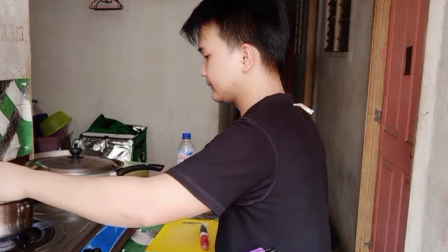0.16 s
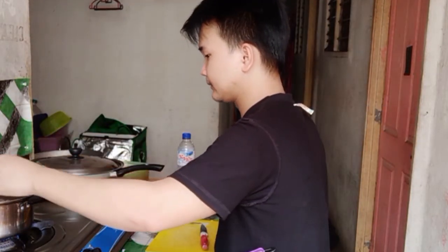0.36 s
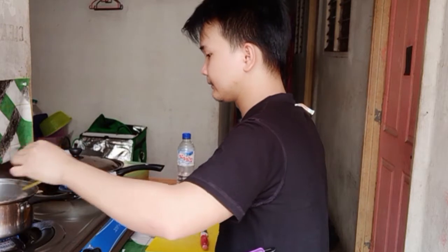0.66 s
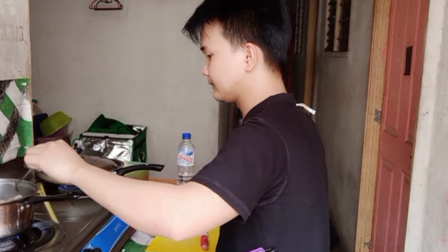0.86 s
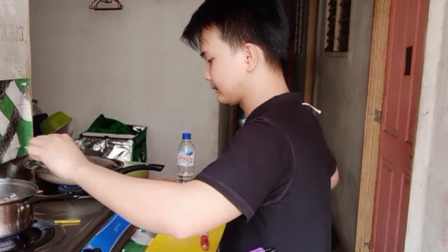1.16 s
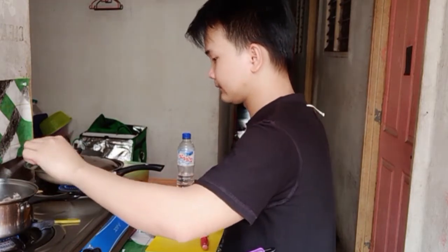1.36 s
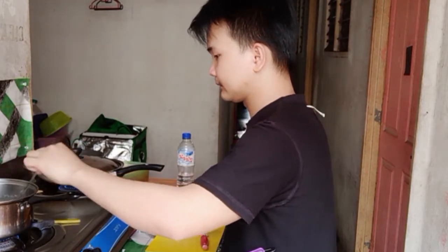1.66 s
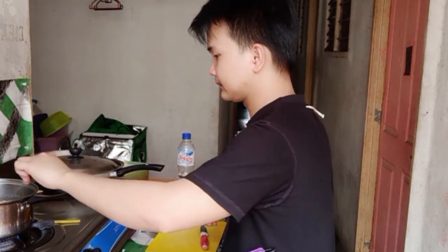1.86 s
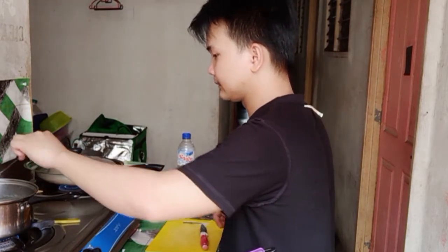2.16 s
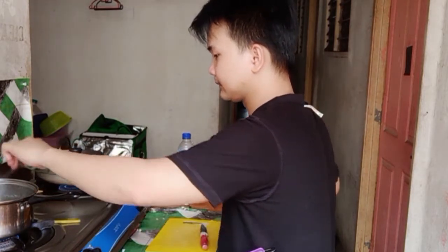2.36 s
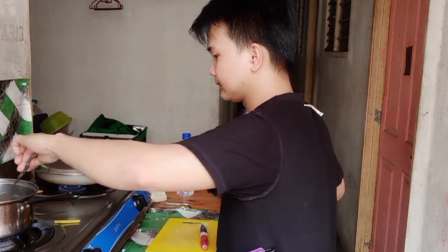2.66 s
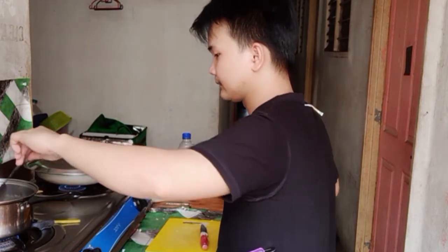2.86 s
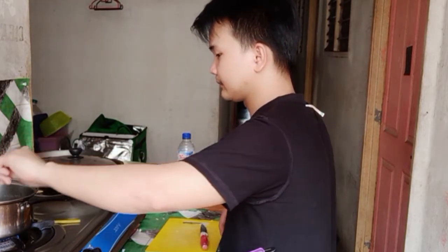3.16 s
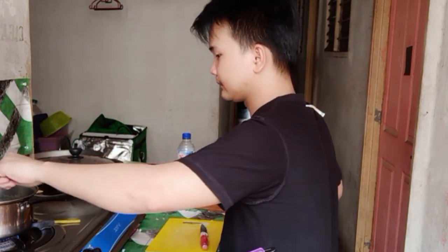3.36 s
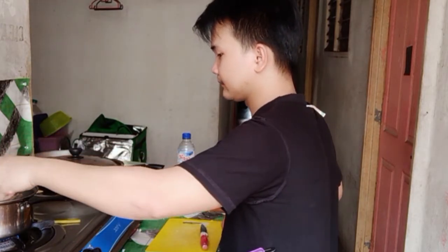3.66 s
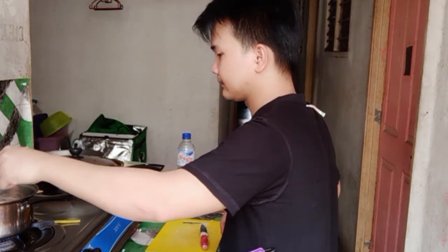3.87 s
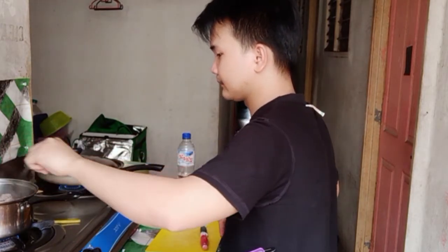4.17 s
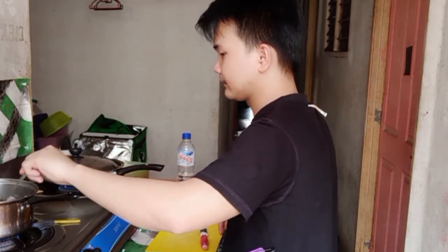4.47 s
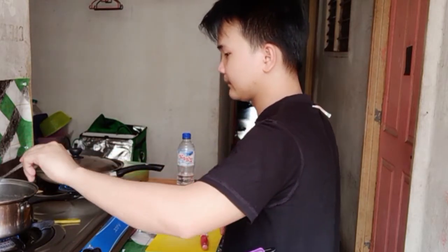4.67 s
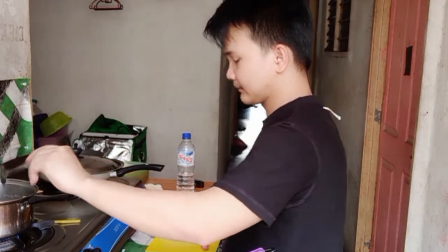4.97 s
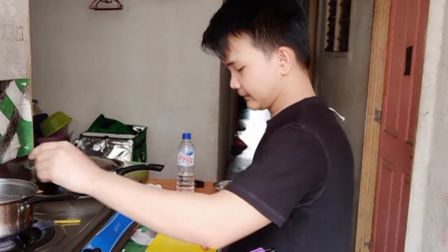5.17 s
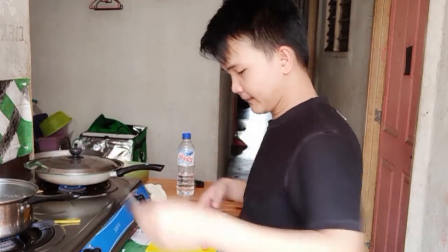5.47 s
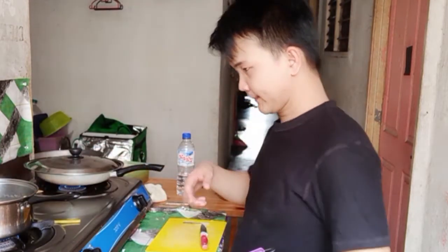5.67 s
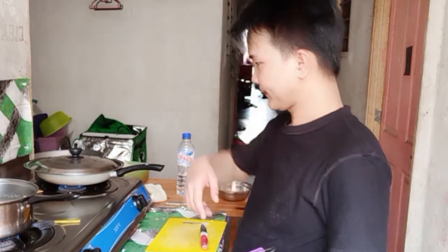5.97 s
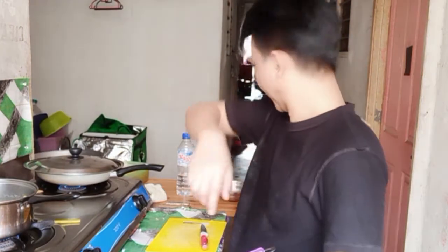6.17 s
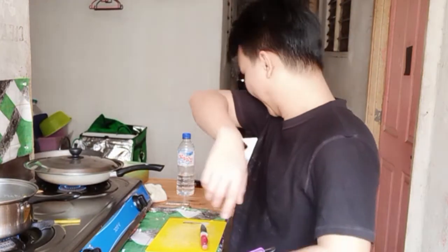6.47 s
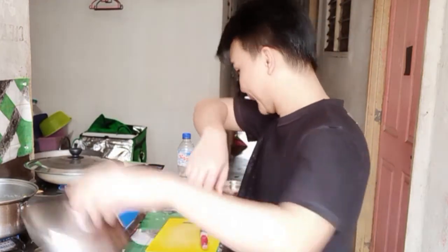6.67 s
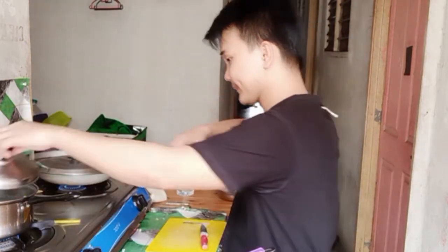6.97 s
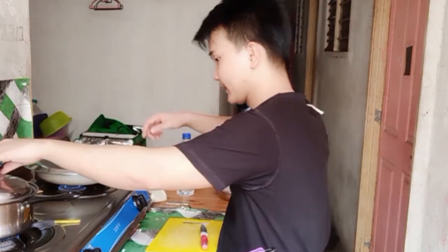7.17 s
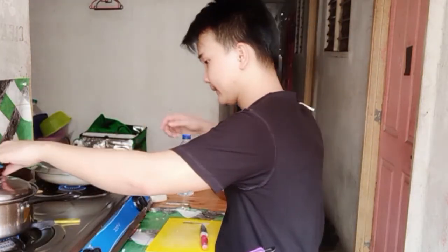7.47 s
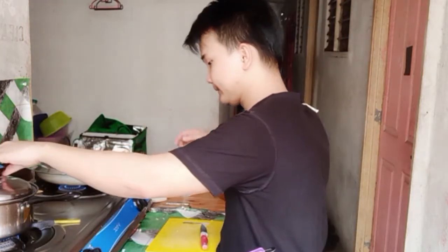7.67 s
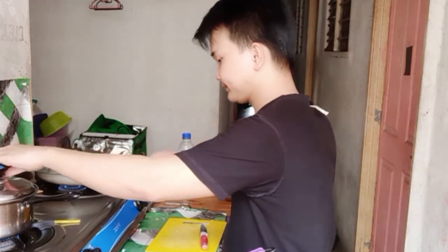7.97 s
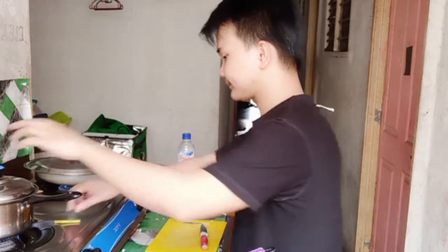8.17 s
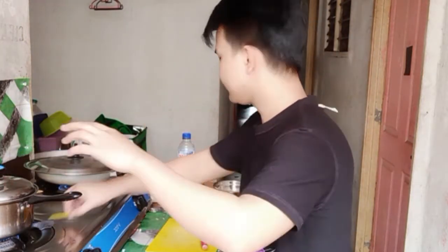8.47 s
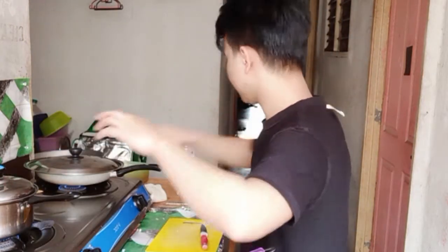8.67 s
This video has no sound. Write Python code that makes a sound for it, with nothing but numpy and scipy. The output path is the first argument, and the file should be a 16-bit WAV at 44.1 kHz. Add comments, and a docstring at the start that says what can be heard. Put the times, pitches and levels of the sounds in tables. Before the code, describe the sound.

A nearby phone picks up, in mono, a small hard-walled kitchen with short, bright reflections. Throughout, a faint gas flame rumbles with a barely audible note, and a hot pot hisses; soft narrow sizzles swell during the first five seconds as a spoon stirs. At 2.0 s the metal spoon ticks the pot with a short scrape; at 2.85 to 3.0 s come firmer clinks with dull knocks, then gritty rubs until 3.25. Only sizzling follows until 5.33, when the spoon's handle lands and it bounces rapidly until about 5.65, a loud bright clatter leaving a thin fading ring. Soft low thumps run from 6.1 to 6.7. At 6.87 a steel lid clanks on the rim, wobbles in quick, weakening low beats until 7.2, rubs hollowly near 7.4 and drops into its seat at 7.52 with a clunk and boom. The pot knocks dully around 8.03 to 8.1; the hiss continues.

```python
"""Cooking at a gas stove in a small, hard-walled kitchen, heard in mono by a phone nearby.
From the start a flame rumbles and a pot hisses, with soft swells of narrower hiss, all shaped noise. At 2 s a metal
spoon taps and scrapes the pot: cracks, ringing modes, gritty rubs, with dull knocks that boom in the counter. At 5.3 s
the spoon drops and clatters: handle, bounces, a thin ring in the pan. Soft thumps follow. At 6.9 s a steel lid meets the
rim, wobbles in even low beats, rubs in a broad resonance and drops into its seat; last, the pot knocks on the stove."""
import sys
import numpy as np
from scipy import signal
from scipy.fft import rfft, irfft
from scipy.io import wavfile
from scipy.ndimage import uniform_filter1d

SR = 44100
rng = np.random.default_rng(int(sys.argv[2]) if len(sys.argv) > 2 else 0)


def transcribe(u):
    """Save the signal u as a 16-bit wav file named by the first command-line argument.

    u: samples, shape (n,) or (channels, n), limited to [-1, 1]; the rate is SR.
    q: integer samples, one column per channel.
    """
    v = np.clip(np.atleast_2d(u).T, -1, 1)
    q = np.round(v * 32767).astype(np.int16)
    wavfile.write(sys.argv[1], SR, q)


N = 389403
TIME = np.arange(N) / SR  # seconds through the scene
AGE = TIME[:SR]  # seconds since a single sound began


def undb(db):
    """Turn decibels into gain."""
    return 10 ** (np.asarray(db) / 20)


def unit(x):
    """Scale to rms 1."""
    return x / np.sqrt(np.mean(x ** 2))


def fade(t60):
    """Free decay over one second, losing 60 dB in t60 seconds."""
    return np.exp(-np.log(1000) * AGE / t60)


def add(track, start_s, sound):
    """Mix a sound into the track at its start time."""
    first = int(start_s * SR)
    track[first:first + len(sound)] += sound[:N - first]


def gain_at(hz, colour):
    """Read a colour's gain on a log-frequency axis."""
    points_hz, level_db = np.transpose(colour)
    return undb(np.interp(np.log(hz + 1), np.log(points_hz), level_db))


def noise(colour, size, tilt_db=0):
    """Noise of a given colour, tilted above 1 kHz by some dB per octave."""
    hz = np.fft.rfftfreq(size, 1 / SR)
    tilt = undb(tilt_db * np.log2(np.maximum(hz, 1000)))
    spectrum = rfft(rng.standard_normal(size)) * gain_at(hz, colour) * tilt
    return unit(irfft(spectrum, size))


def resonance(hz, width_hz, size):
    """Noise through the same resonance twice, for steeper sides."""
    b, a = signal.iirpeak(hz, hz / width_hz, fs=SR)
    once = signal.lfilter(b, a, rng.standard_normal(size))
    return unit(signal.lfilter(b, a, once))


def walk(rate_hz):
    """Slow random drift with an rms of 1."""
    hold = int(SR / rate_hz)
    steps = np.repeat(rng.standard_normal(N // hold + 1), hold)
    smooth = uniform_filter1d(uniform_filter1d(steps, hold), hold)
    return unit(smooth[:N])


def waver(x, depth_db, patch_hz, patch_s, size=1024):
    """Narrow bands of a sound swell and sink, each on its own."""
    hz, s, bands = signal.stft(x, SR, nperseg=size)
    chance = rng.standard_normal(bands.shape)
    # smooth twice along frequency and time, so chance comes in patches
    for axis, span in 2 * [(0, patch_hz / hz[1]), (1, patch_s / s[1])]:
        chance = uniform_filter1d(chance, max(1, round(span)), axis=axis)
    wavering = signal.istft(bands * undb(depth_db * unit(chance)), SR, nperseg=size)[1]
    return unit(wavering[:N])


def partials(hz, t60):
    """One fading sine per row, starting at rms 1."""
    age, hz, t60 = np.float32(AGE), np.float32(hz)[:, None], np.float32(t60)[:, None]
    return np.sqrt(2) * np.sin(2 * np.pi * hz * age) * np.exp(-float(np.log(1000)) * age / t60)


def kitchen(x, early_db=-3, early_t60=0.087, late_db=-5, late_t60=0.52, treble_t60=0.34):
    """Close walls answer at once; a short tail follows, in which the treble dies first."""
    early = unit(rng.standard_normal(SR) ** 3) * fade(early_t60) * (AGE > .002)
    body = noise([(100, 0.5), (5500, 2), (9000, -9)], SR) * fade(late_t60)
    treble = noise([(4000, -18), (7500, 3.0), (15000, -4.5)], SR) * fade(treble_t60)
    build_up = 1 - np.exp(-AGE / 0.0097)
    late = (body + undb(0.5) * treble) * build_up
    response = undb(early_db) * early / np.linalg.norm(early)
    response += undb(late_db) * late / np.linalg.norm(late)
    return undb(-1) * (x + signal.fftconvolve(x, response)[:N])


def ringing(blows, modes, beat=0.82):
    """Every blow tops up the energy of the main modes; each has a weaker twin that makes it beat."""
    start = blows[0][0]
    t = np.arange(int((blows[-1][0] - start + 1.2) * SR)) / SR
    energy = np.zeros(len(t))
    for s, db, ring_db, _ in blows:
        energy[max(0, int((s - start) * SR))] += undb(db + ring_db) ** 2
    ring = np.zeros(len(t))
    for hz, db, t60 in modes:
        energy_kept = fade(t60)[2]  # per sample: two samples of amplitude decay
        size = undb(db) * np.sqrt(2 * signal.lfilter([1], [1, -energy_kept], energy))
        twin_hz = hz + rng.uniform(-13, 14.0)
        ring += size * (np.sin(2 * np.pi * hz * t) + beat * np.sin(2 * np.pi * twin_hz * t))
    out = np.zeros(N)
    add(out, start, ring / np.linalg.norm(undb(np.array(modes)[:, 1])))
    # thin sheet radiates little bass
    return signal.sosfilt(signal.butter(2, 350, "highpass", fs=SR, output="sos"), out)


def struck(blows, modes, colour, crack_t60, shimmer_db, shimmer_t60, count=300):
    """Thin metal: each blow cracks and shimmers in crowded overtones that fill the room; main modes ring on."""
    over_hz = 1200 + (np.arange(count) + rng.random(count)) * 14300 / count
    over_gain = gain_at(over_hz, colour) * undb(2.5 * rng.standard_normal(count))
    # shimmer_t60 holds at 5 kHz; higher overtones die sooner
    overtones = partials(over_hz, shimmer_t60 * (over_hz / 5000) ** -.25)
    clash = np.zeros(N)
    contact = 1 - np.exp(-AGE / 0.00055)  # the blow takes a moment to spread through the sheet
    for s, db, _, tilt_db in blows:
        # each point of contact favours other overtones
        weights = over_gain * rng.standard_normal(count) * undb(tilt_db * np.log2(over_hz))
        shimmer = undb(shimmer_db) * (weights @ overtones) / np.linalg.norm(weights)
        crack = noise(colour, SR, tilt_db) * fade(crack_t60)
        add(clash, s, undb(db) * contact * (crack + shimmer))
    return kitchen(clash) + ringing(blows, modes)


# colour of the flame: (point_hz, level_db)
RUMBLE_COLOUR = [(25, -12.5), (60, -16), (110, 6), (220, -7.5), (350, -1), (500, -6.5), (830, -11),
                 (1200, -6), (1700, -7.5), (2500, -12), (3200, -3), (4200, -36), (6000, -29.5)]
# colour of the hot pot: (point_hz, level_db)
HISS_COLOUR = [(1400, -42), (2600, -52), (3100, -19), (3700, -2.5), (4400, -1.5), (5600, 0), (6600, 1),
               (7200, -4.5), (7800, -13.5), (9000, -18), (10500, -30), (13000, -27.5), (15500, -26)]
# the flame's faint note; swell and flicker are the rms of its slow and faster drift
NOTE_HZ, NOTE_WIDTH_HZ, NOTE_DB = 995.4, 76, -70
NOTE_SWELL_DB, NOTE_FLICKER_DB = 2.5, 4


def stove(edge_hz=4250):
    """The flame's rumble wavers and holds a faint note; the hot pot hisses, most strongly above a sharp edge."""
    rumble = waver(noise(RUMBLE_COLOUR, N), depth_db=4.2, patch_hz=90, patch_s=.07)
    flame = undb(-61 + .5 * walk(7)) * rumble
    note_db = NOTE_DB + NOTE_SWELL_DB * walk(4) + NOTE_FLICKER_DB * walk(14)
    flame_note = undb(note_db) * resonance(NOTE_HZ, NOTE_WIDTH_HZ, N)
    steam = waver(noise(HISS_COLOUR, N), depth_db=2.5, patch_hz=170, patch_s=.07)
    hiss = undb(-53.5 + .5 * walk(2.21)) * steam
    bright = signal.sosfiltfilt(signal.butter(10, edge_hz, "highpass", fs=SR, output="sos"), hiss)
    return flame + flame_note + undb(-4.0) * hiss + undb(-8.0) * bright


# early swells sizzle as the spoon stirs; the one at 5.85 s is the clatter's noisy tail, at 7.416 s the lid sliding:
# (peak_s, half_length_s, level_db before the band filter, centre_hz)
SWELLS = [(0.044, 0.24, -51.5, 4500), (0.528, 0.091, -50, 5230), (0.757, 0.26, -51.5, 5500),
          (0.997, 0.14, -49.5, 4750), (1.718, 0.16, -51.5, 5370), (2.28, 0.21, -48.5, 4660),
          (2.83, 0.09, -53, 5430), (3.815, .2, -51, 5130), (4.67, 0.14, -51, 4730),
          (5.85, 0.19, -52.5, 4580), (7.416, 0.12, -54.5, 5800)]
SWELL_FOOT_HZ = 3520  # sets the width from the centre, so a brighter swell is also wider


def hiss_swells():
    """Soft swells of narrow resonant noise, cut to a hiss with a steep lower edge."""
    swells = np.zeros(N)
    for peak_s, half_length_s, db, hz in SWELLS:
        swell = np.exp(-((TIME - peak_s) / half_length_s) ** 2)
        swells += undb(db) * swell * resonance(hz, hz - SWELL_FOOT_HZ, N)
    return signal.sosfilt(signal.butter(6, [4000, 7500], "bandpass", fs=SR, output="sos"), swells)


# spoon against the pot: (start_s, level_db, ring_db against the level, brightness_db_per_octave)
TAPS = [(1.996, -31.5, -29, -1.5), (2.005, -35, -14, 11), (2.844, -35, -6, 18), (2.848, -27.5, -7.5, -1.5),
        (2.996, -28, -7.5, -1.5), (3.002, -26, -19, -5), (3.022, -31, -24, -5)]
# ringing modes of the pot: (pitch_hz, level_db, t60_s)
POT_MODES = [(2735, -1, 0.17), (3160, -20, 0.38), (3380, -5, 0.33), (3680, 12.5, 0.058), (3850, 1, 0.27),
             (4500, -18, .4), (5265, -20, .4), (5660, -17, 0.25), (5650, -6, 0.15), (5920, -7, 0.13),
             (6500, -6, 0.16), (7531, -17, 0.24), (8230, -4, 0.72), (10300, -21, .2), (11700, -6, 0.35),
             (11800, -15, .2)]
# colour of spoon on pot: (point_hz, level_db)
POT_COLOUR = [(290, -45), (500, -34), (982, -22), (2100, -23.5), (2720, -21), (2930, -13), (3900, -6),
              (4700, -7.5), (6180, 1.5), (7450, -7.5), (13800, -9.5), (15500, -8)]


def spoon_taps():
    """The spoon strikes the pot's thin metal, which cracks, shimmers and rings."""
    return struck(TAPS, POT_MODES, POT_COLOUR, crack_t60=0.055, shimmer_db=-6.5, shimmer_t60=0.18)


# dull knocks of pot, lid and stove: (start_s, level_db, pitch_hz, t60_s, brightness_db_per_octave)
KNOCKS = [(2.03, -54.5, 720, 0.24, -5), (2.852, -49, 800, 0.22, -18), (2.884, -47, 443, 0.11, -17),
          (3.005, -47.5, 322, 0.24, -2), (3.17, -61, 600, 0.18, -1.5), (5.448, -49, 380, 0.22, -3),
          (6.871, -36.5, 503, 0.09, -11), (6.878, -25, 786, 0.036, -23), (6.964, -34.5, 560, 0.042, -20),
          (7.538, -37, 348, 0.2, -3.5), (8.026, -42, 365, 0.26, -8.5), (8.09, -51.5, 430, 0.19, -12)]
# mode clusters of a knock: (multiple of its pitch)
KNOCK_RATIOS = [0.98, 2.06, 3.6]
BOOM_HZ = 350  # reference pitch for a knock's attack and its boom in the counter


def knocks(spread=0.49, attack_s=0.0039):
    """Heavy contacts shake clusters of low, well damped modes; the lower the pitch, the softer the attack."""
    out = np.zeros(N)
    for s, db, hz, t60, tilt_db in KNOCKS:
        # attack_s is the time constant at BOOM_HZ
        shape = fade(t60) * (1 - np.exp(-AGE / attack_s * (hz / BOOM_HZ) ** 2))
        for ratio in KNOCK_RATIOS:
            body = resonance(hz * ratio, spread * hz * ratio, SR) * shape
            level = undb(db + tilt_db * np.log2(ratio)) * np.linalg.norm(shape) / np.linalg.norm(body)
            add(out, s, level * body)
    return out


# soft thumps that boom in the counter and floor: (start_s, level_db)
THUMPS = [(5.565, -46.5), (6.131, -51), (6.361, -48), (6.412, -48.5), (6.66, -52), (7.535, -36.5),
          (7.622, -48), (8.125, -47)]
# a knock also booms, the more so the lower its pitch: level against the knock at BOOM_HZ, dB per octave, delay
BOOM_DB, BOOM_TILT_DB, BOOM_LAG_S = -9.5, -10, 0.00735
# fainter thumps fall at random while the lid is fetched and put on
SHUFFLE_FROM_S, SHUFFLE_TO_S, SHUFFLE_DB = 6, 7.95, -52.5


def pushes(count=5):
    """All that shakes the counter, as (start_s, level_db): thumps, the weight behind each knock, a random shuffle."""
    weight = []
    for s, db, hz, _, _ in KNOCKS:
        boom_db = db + BOOM_DB + BOOM_TILT_DB * np.log2(hz / BOOM_HZ)
        weight.append((s + BOOM_LAG_S, boom_db))
    places = (np.arange(count) + rng.random(count)) / count
    shuffle = SHUFFLE_FROM_S + (SHUFFLE_TO_S - SHUFFLE_FROM_S) * places
    return THUMPS + weight + [(s, SHUFFLE_DB) for s in shuffle]


def thumps(t60=.36, attack_s=0.0089):
    """Soft pushes set the lowest resonances booming."""
    out = np.zeros(N)
    shape = fade(t60) * (1 - np.exp(-AGE / attack_s))
    for s, db in pushes():
        boom = undb(-7.0) * resonance(120, 160, SR)
        for hz, mode_db in [(104, -0.4), (121, -0.64), (153, -1.3)]:
            boom += undb(mode_db) * np.sin(2 * np.pi * (hz * AGE + rng.random()))
        add(out, s, undb(db) * boom * shape)
    return out


# metal sliding on metal: (peak_s, rise_s, fall_s, level_db)
SCRAPES = [(2.084, 0.016, 0.019, -45), (3.164, 0.03, 0.046, -41), (3.235, 0.043, 0.027, -45.5),
           (7.028, 0.028, 0.064, -40), (7.514, 0.02, 0.021, -34.5)]
# colour of the sliding edge: (point_hz, level_db)
SCRAPE_COLOUR = [(800, -16), (2000, -24.5), (3400, -2), (4500, -7), (6400, 3.5), (8500, -2.5),
                 (11000, -6.5), (15000, -3.5)]


def scrapes(grain_db=4):
    """Sliding edges catch on tiny bumps: a gritty swell that wakes shifting overtones."""
    out = np.zeros(N)
    for peak_s, rise_s, fall_s, db in SCRAPES:
        t = AGE - .5  # the swell peaks half a second in
        swell = np.exp(-(t / np.where(t < 0, rise_s, fall_s)) ** 2)
        bump_times = AGE[::60]
        bumps = np.interp(AGE, bump_times, rng.standard_normal(len(bump_times)))
        grit = unit(undb(grain_db * bumps))
        rub = waver(grit * noise(SCRAPE_COLOUR, SR), depth_db=2, patch_hz=90, patch_s=0.078)[:SR]
        add(out, peak_s - .5, undb(db) * swell * rub)
    return out


# the spoon's handle touches down first: (start_s, level_db, ring_db against the level, brightness_db_per_octave)
HANDLE = [(5.334, -21.5, -15.5, 2.5), (5.347, -27, -32, 1.5)]
# ringing modes of the handle's landing: (pitch_hz, level_db, t60_s)
HANDLE_MODES = [(1010, -9, .25), (1480, -8, .26), (1723, 1, .26), (2137, -5, .4), (2277, 1, .24),
                (3203, -6, .13), (3548, -10, .2), (6751, -3, .12)]
# colour of the handle's contact: (point_hz, level_db)
HANDLE_COLOUR = [(120, -54), (240, -39), (340, 2), (500, -31), (1000, 5), (1250, -8), (1700, 4), (2250, 0),
                 (2900, -4), (4000, -6.5), (6400, -3), (10500, -15.5), (15000, -9)]


def handle_landing():
    """The dropped spoon's handle strikes and wakes its own set of lower modes."""
    return struck(HANDLE, HANDLE_MODES, HANDLE_COLOUR, crack_t60=0.11, shimmer_db=-6.0, shimmer_t60=0.1)


# the dropped spoon bounces: (start_s, level_db, ring_db against the level, brightness_db_per_octave)
BOUNCES = [(5.430, -21, -29, -2), (5.441, -19.5, -7, 5), (5.466, -22, -2, 1), (5.482, -21, -1.5, -1.5),
           (5.522, -21, -18, 2), (5.533, -23, -4.5, 1), (5.598, -27.5, -12, 1), (5.622, -31, -3, 1)]
# ringing modes of the spoon: (pitch_hz, level_db, t60_s)
SPOON_MODES = [(1540, -15, .4), (2135, -25, .9), (2622, -11, .4), (3099, -9, .44), (3972, -5, .42),
               (4325, 1, .41), (5062, -9, .45), (5102, -10, .58), (5411, -10, .42), (5453, -11, .41),
               (6135, -9, .33), (6165, -9, .33), (6213, -7, .33), (6279, -4, .41), (6570, -9, .44),
               (6752, -7, .5), (7219, -14, .39), (7720, -14, .35), (8036, -11, .5), (8145, -12, .39),
               (8576, -16, .49), (9900, -18, .28), (11499, -11, .28), (13110, -14, .28), (14400, -15, .25)]
# colour of the bouncing spoon: (point_hz, level_db)
SPOON_COLOUR = [(100, -54), (250, -30), (450, -24), (900, -7), (1550, -10), (1900, -4), (2300, -1.5),
                (2800, -5), (4300, 2.5), (4700, -3.5), (6400, 4.5), (8300, -4), (10500, -7.5), (14500, -4)]
# each bounce is echoed by a weaker, brighter one: delay, level change, brightness change in dB per octave
REBOUND_S, REBOUND_DB, REBOUND_TILT_DB = 0.022, -8.5, 1.5


def with_rebounds(blows, ring_loss_db=-4):
    """Every blow is followed by a lighter, brighter one that rings less."""
    rebounds = []
    for s, db, ring_db, tilt_db in blows:
        rebounds.append((s + REBOUND_S, db + REBOUND_DB, ring_db + ring_loss_db, tilt_db + REBOUND_TILT_DB))
    return sorted(list(blows) + rebounds)


def spoon_bounces():
    """The spoon clatters to rest, each bounce echoed by a lighter, brighter one, ringing in many bright modes."""
    blows = with_rebounds(BOUNCES)
    return struck(blows, SPOON_MODES, SPOON_COLOUR, crack_t60=0.1, shimmer_db=-1.0, shimmer_t60=0.11)


# the pan that the spoon lands on sings on faintly: (pitch_hz, level_db, t60_s)
PAN_MODES = [(2132, -54.5, 2.5), (4549, -56, 2.5)]


def pan_ring():
    """The spoon's first bounce leaves a thin ring in the pan, one second of a slow decay."""
    hz, db, t60 = np.transpose(PAN_MODES)
    out = np.zeros(N)
    add(out, BOUNCES[0][0], undb(db) @ partials(hz, t60))
    return out


# lid meets the rim: (start_s, level_db, ring_db against the level, brightness_db_per_octave)
LID_TOUCHES = [(6.874, -29, -26, 0), (6.884, -32.5, -11, 2), (6.979, -45, -2.5, -2)]
# ringing modes of the lid: (pitch_hz, level_db, t60_s)
LID_MODES = [(517, 3, .3), (863, 3.5, .32), (1024, 1, 0.61), (1380, -11, .2), (3060, -4, .25),
             (3480, -4, .3), (3900, -2, .3), (6340, 9, 0.31), (6620, -8, .3), (7000, 1, 0.53),
             (7224, -6, .25), (8300, 0, 0.27), (13900, 2, .12)]
# colour of lid on rim: (point_hz, level_db)
LID_COLOUR = [(180, -46), (300, -24), (348, -6.5), (720, -14), (794, -9), (2610, -22), (3230, -7),
              (4420, -18.5), (6360, -13), (9760, -17.5), (15500, -14)]


def lid_touches():
    """The steel lid meets the rim and rings in its own modes."""
    return struck(LID_TOUCHES, LID_MODES, LID_COLOUR, crack_t60=0.055, shimmer_db=-8.5, shimmer_t60=0.16)


# the lid rocks on the rim in even beats that tend to grow weaker and fall in pitch
WOBBLE_START_S, WOBBLE_PERIOD_S, WOBBLE_T60_S = 6.967, 0.0315, 0.038
WOBBLE_FIRST_HZ, WOBBLE_LAST_HZ = 546, 420
WOBBLE_DB, WOBBLE_FADE_DB_PER_S, WOBBLE_SCATTER_DB = -33.5, 54, 3


def wobble(count=8, attack_s=0.0012, upper_ratio=1.3, upper_db=-7):
    """Each beat of the rocking lid rings a pair of low, quickly damped modes."""
    out = np.zeros(N)
    pitches = np.geomspace(WOBBLE_FIRST_HZ, WOBBLE_LAST_HZ, count)
    scatter = WOBBLE_SCATTER_DB * rng.standard_normal(count)
    for beat, hz in enumerate(pitches):
        elapsed_s = WOBBLE_PERIOD_S * beat
        db = WOBBLE_DB - WOBBLE_FADE_DB_PER_S * elapsed_s + scatter[beat]
        pair = undb([0, upper_db]) @ partials([hz, hz * upper_ratio], [WOBBLE_T60_S, WOBBLE_T60_S])
        add(out, WOBBLE_START_S + elapsed_s, undb(db) * pair * (1 - np.exp(-AGE / attack_s)))
    return out


# the lid is drawn across the rim around the time it seats: a faint, hollow rub
RUB_S, RUB_HALF_S, RUB_DB, RUB_HZ, RUB_WIDTH_HZ = 7.42, 0.12, -58.5, 1420, 940


def rim_rub():
    """The sliding lid swells and fades in one broad resonance."""
    swell = np.exp(-((TIME - RUB_S) / RUB_HALF_S) ** 2)
    return undb(RUB_DB) * swell * resonance(RUB_HZ, RUB_WIDTH_HZ, N)


# lid drops into its seat: (start_s, level_db, ring_db against the level, brightness_db_per_octave)
LID_DROPS = [(7.517, -27.5, -10, 0.5), (7.527, -36, -18, -11), (7.544, -40, -12, 4)]
# ringing modes of the covered pot: (pitch_hz, level_db, t60_s)
COVERED_POT_MODES = [(1187, -9, 0.63), (2190, -8, 0.24), (2330, -11, 0.2), (3010, -4, 0.37),
                     (3270, -17, 0.28), (3995, 4, 0.14), (4960, -10, .18), (5700, 1, .25), (6180, 2, 0.21),
                     (8250, -6, 0.59)]
# colour of the lid seating: (point_hz, level_db)
COVERED_POT_COLOUR = [(180, -25), (300, -9.5), (756, -13), (835, -10), (1620, -10), (1780, -19),
                      (2170, 3.5), (2520, -8.5), (3230, -1.5), (6460, -0.5), (15500, -17.5)]


def lid_drops():
    """The lid falls into its seat, and the covered pot rings in its own modes."""
    return struck(LID_DROPS, COVERED_POT_MODES, COVERED_POT_COLOUR,
                  crack_t60=0.14, shimmer_db=-6.5, shimmer_t60=0.15)


def scene():
    """Spoon, lid and pot in the kitchen, over the stove."""
    metal = spoon_taps() + handle_landing() + spoon_bounces() + lid_touches() + lid_drops()
    dull = knocks() + wobble() + rim_rub()
    mono = stove() + hiss_swells() + metal + pan_ring() + kitchen(scrapes() + dull) + thumps()
    return np.array([mono, mono])


TOP_HZ = 15600  # upper limit of the phone


def record(dry):
    """The phone rounds the loudest peaks and cuts the top."""
    rounded = .42 * np.tanh(dry / .42)
    return signal.sosfilt(signal.ellip(10, .2, 70, TOP_HZ, fs=SR, output="sos"), rounded)


dry = scene()
out = record(dry)
transcribe(out)
```